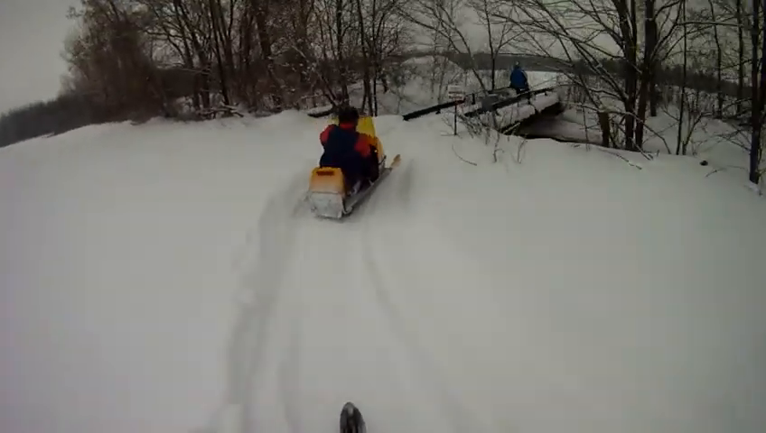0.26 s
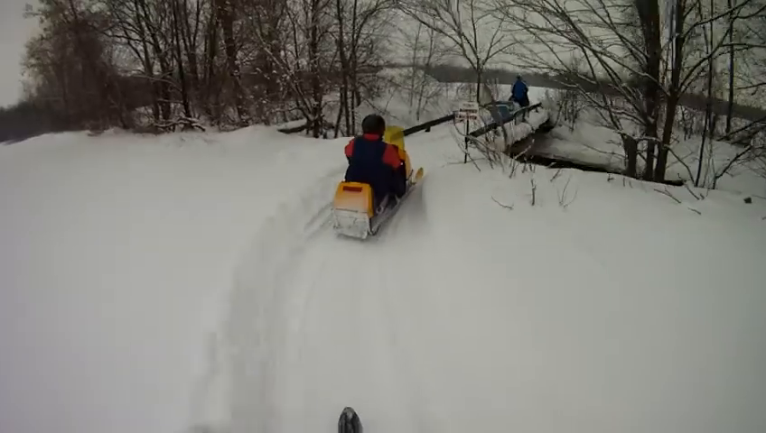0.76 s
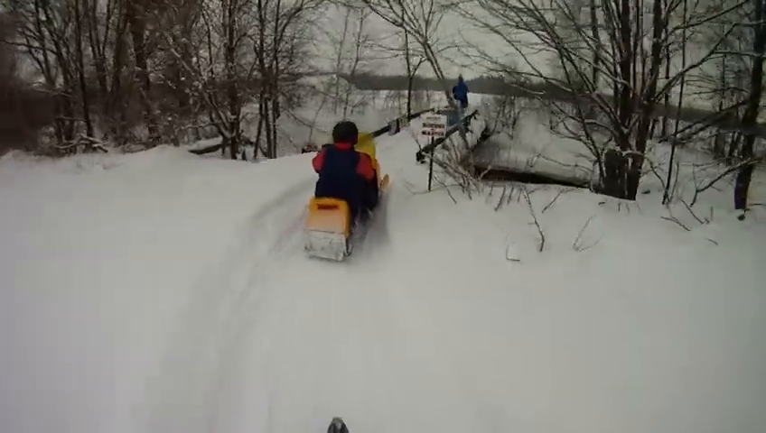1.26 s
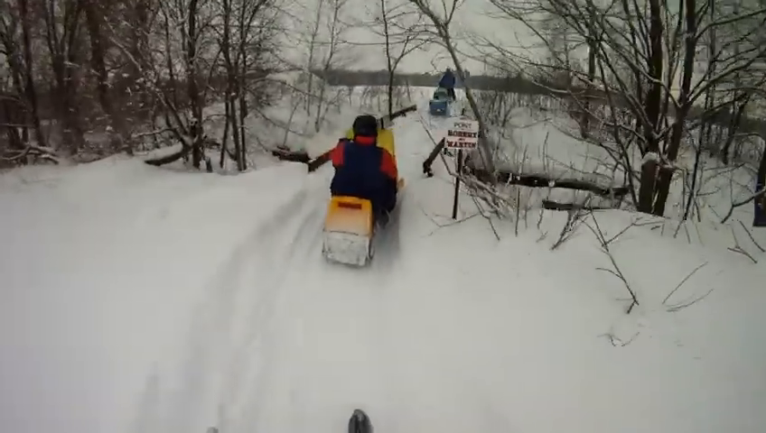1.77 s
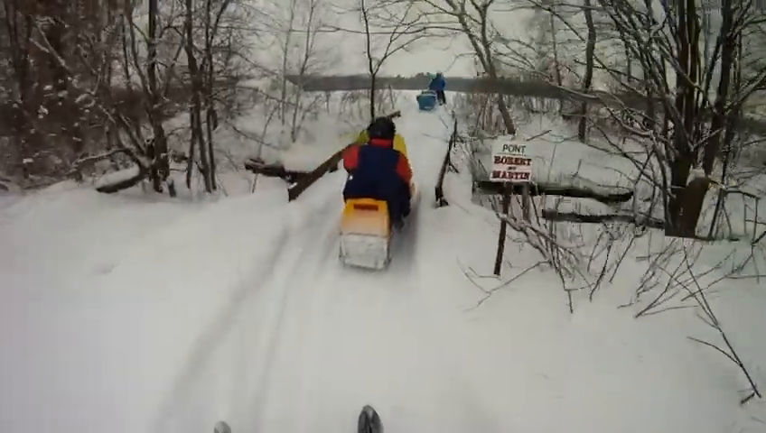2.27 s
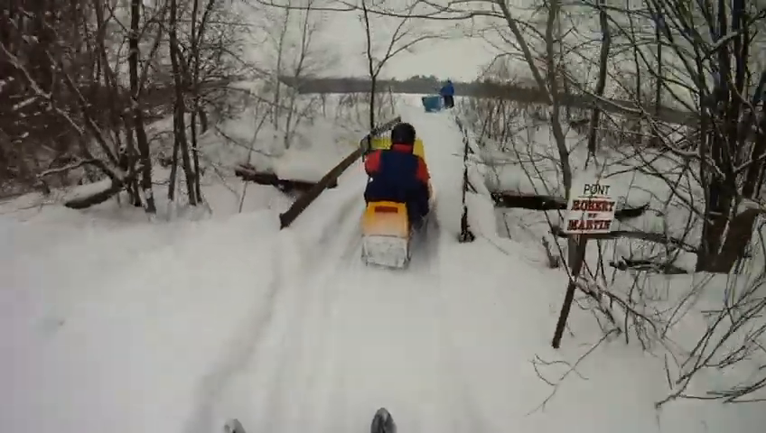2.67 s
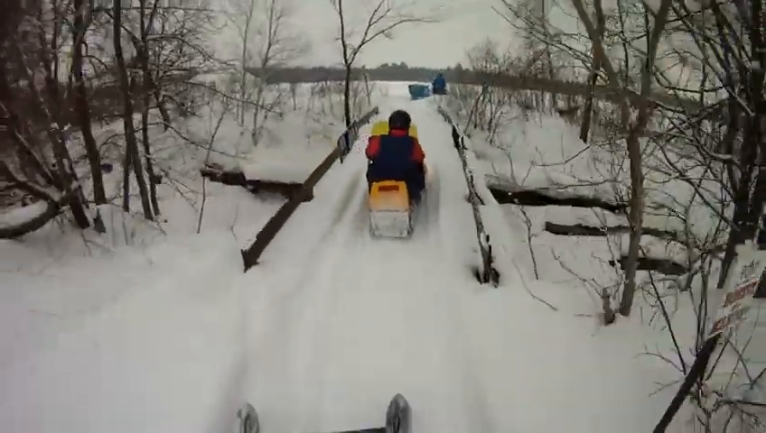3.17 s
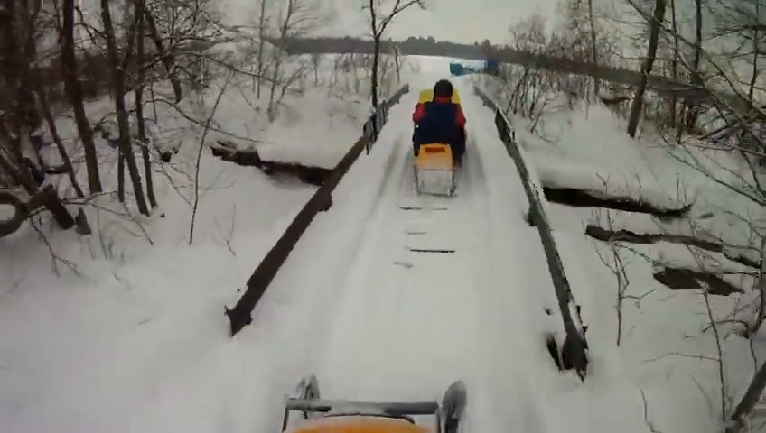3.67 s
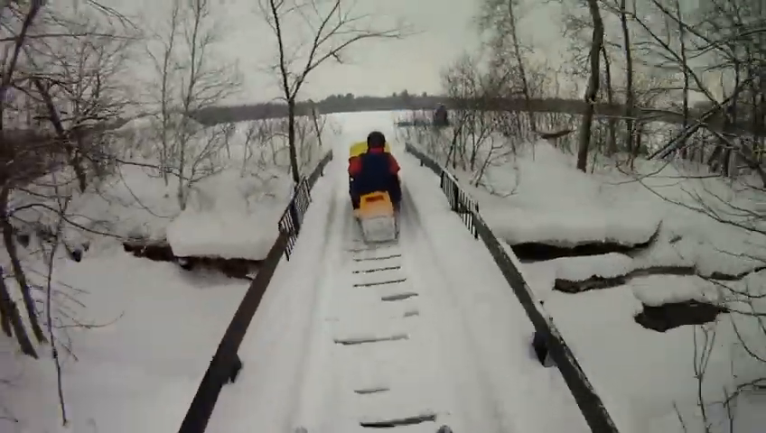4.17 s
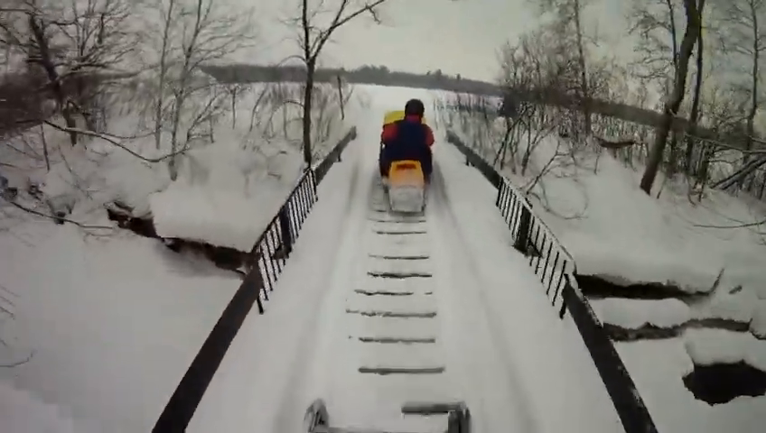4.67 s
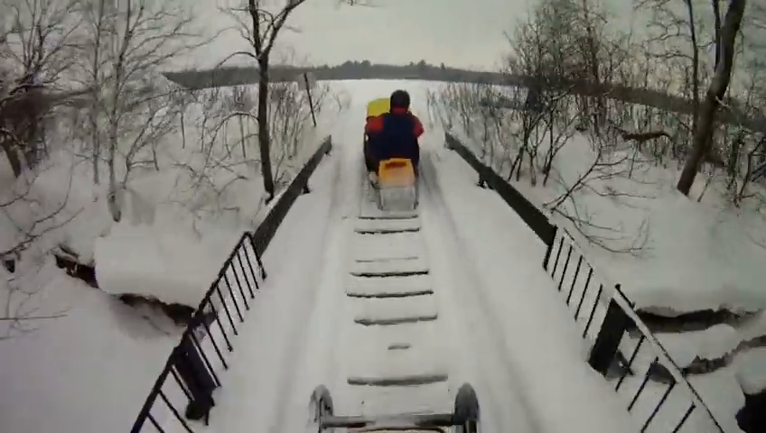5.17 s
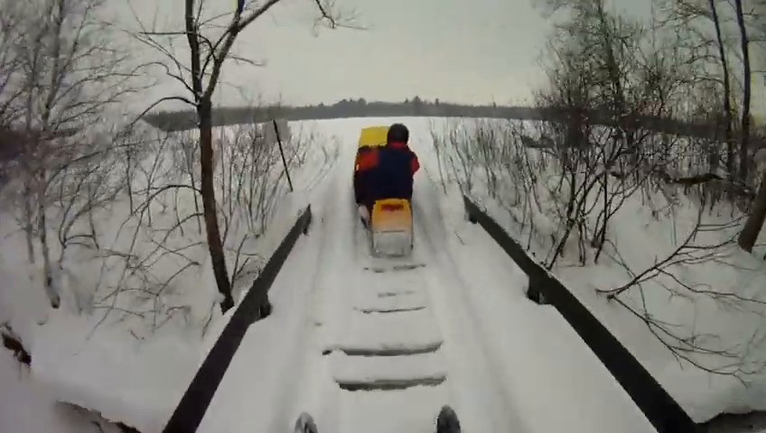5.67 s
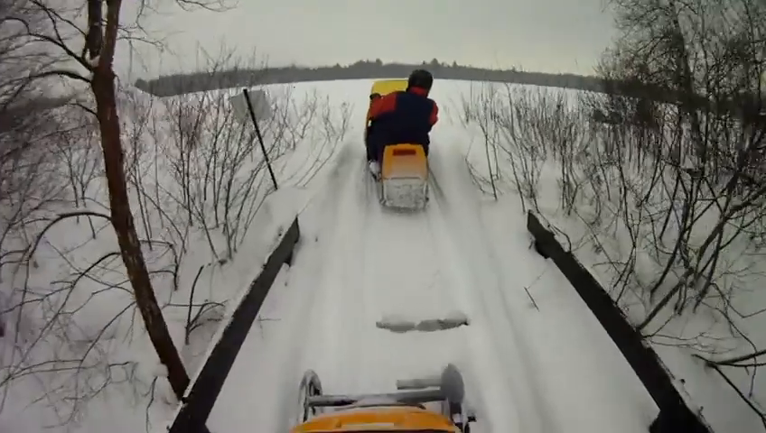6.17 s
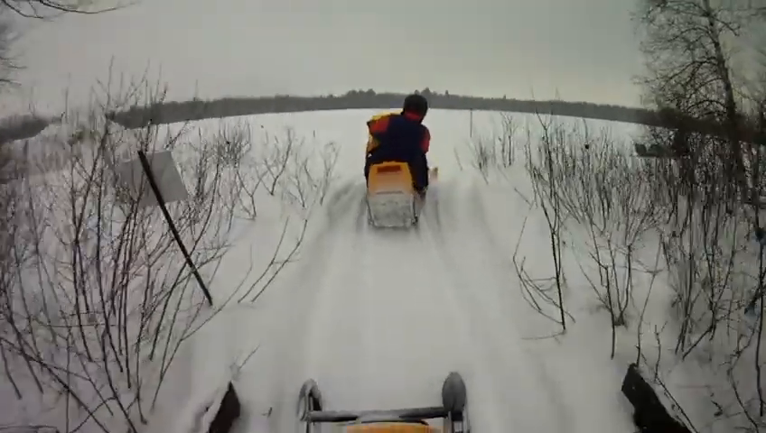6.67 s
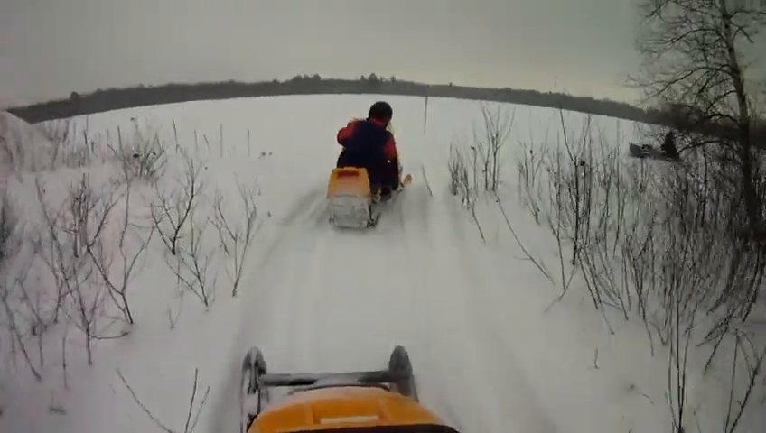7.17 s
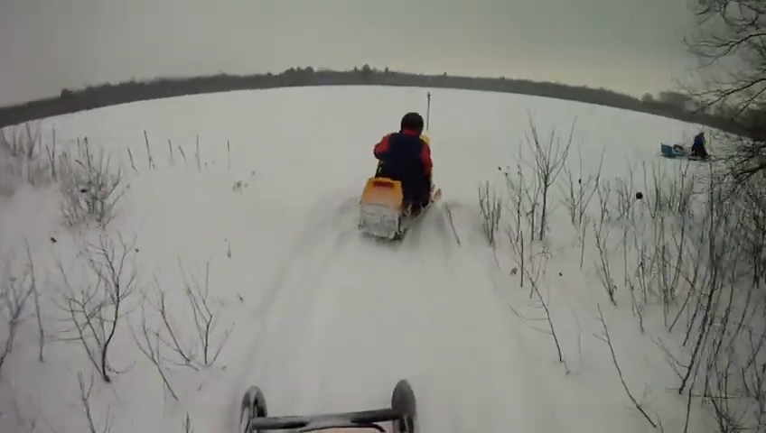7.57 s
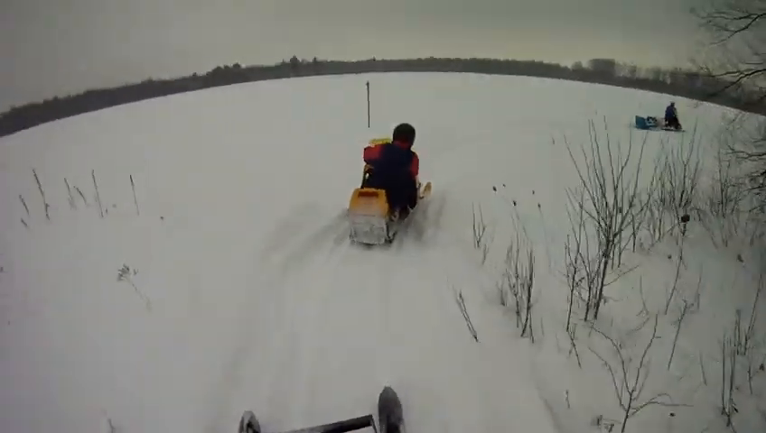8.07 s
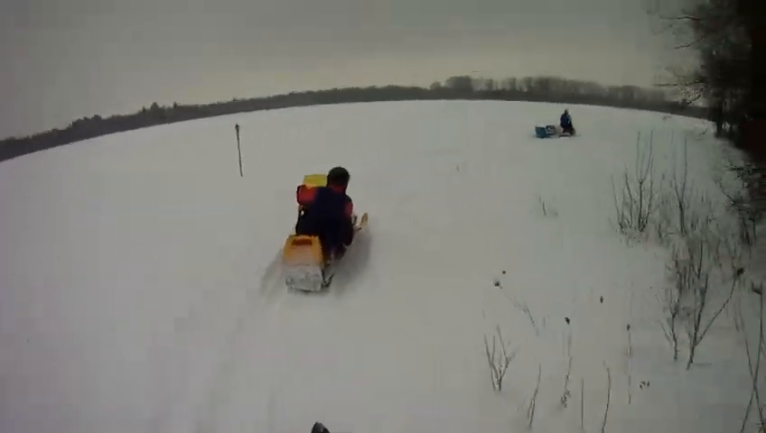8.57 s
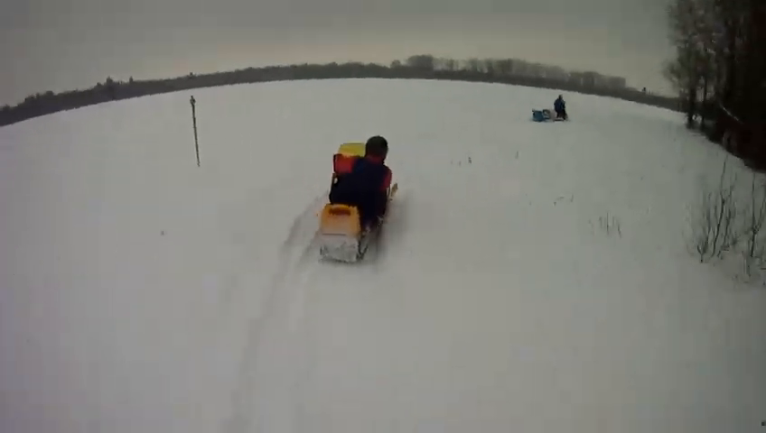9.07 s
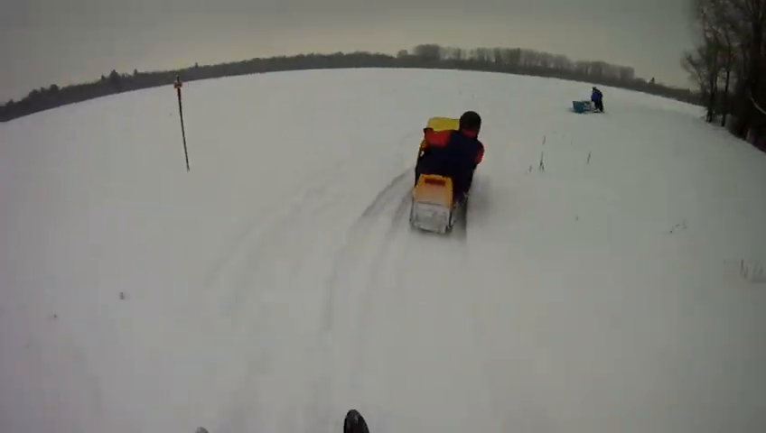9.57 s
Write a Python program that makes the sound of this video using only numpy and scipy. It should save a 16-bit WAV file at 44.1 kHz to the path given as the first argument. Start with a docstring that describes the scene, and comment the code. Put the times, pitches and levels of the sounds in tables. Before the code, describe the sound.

An old single-cylinder two-stroke snowmobile runs along a snowy trail, heard close from the rider's seat. After a brief burst of throttle it slows, misfiring with irregular pops and bangs. It picks up again and a hollow wooden bridge drums under the track. Beyond the bridge the engine pulls more steadily, then eases and surges. Track rumble, metallic rattle and a faint hiss of skis on snow continue throughout.

```python
"""An old single-cylinder two-stroke snowmobile crosses a snowy bridge, heard from the rider's seat.
Under throttle it fires on every turn; off throttle it misses and the stored charge bangs.
The piston clatters, the intake hums and rasps, the track rumbles and rattles, the wooden deck drums
and the skis scrape. The recorder's limiter ducks after each bang and its treble fizzes."""
import sys
import numpy as np
from scipy import signal
from scipy.fft import rfft, irfft, next_fast_len
from scipy.io import wavfile
from scipy.ndimage import uniform_filter1d, map_coordinates

SR = 44100
rng = np.random.default_rng(int(sys.argv[2]) if len(sys.argv) > 2 else 0)


def master(y):
    """Save y as 16-bit WAV."""
    cut = np.clip(np.atleast_2d(y).T, -1, 1)
    pcm = np.round(cut * 32767)  # scale
    wavfile.write(sys.argv[1], SR, pcm.astype(np.int16))


N = 433052
TIME = np.arange(N) / SR

# crank speed: (time [s], speed [turns/s])
CRANK_SPEED = [(0.0, 57.68), (0.24, 51.95), (0.44, 55.55), (0.7, 49.91), (1.16, 47.8), (1.74, 40.8),
               (1.91, 43.65), (2.25, 37.46), (2.85, 46.15), (3.03, 40.02), (3.38, 52.14), (3.69, 58.47),
               (4.22, 48.55), (4.65, 53.07), (4.86, 51.88), (5.27, 59.04), (5.78, 46.9), (6.04, 52.01),
               (6.26, 48.99), (6.52, 50.83), (6.77, 58.43), (7.0, 61.42), (7.28, 59.25), (8.09, 59.99),
               (8.32, 63.35), (8.78, 52.14), (9.18, 60.57), (9.82, 56.08)]


def from_db(db):
    """Decibels to gain."""
    return 10 ** (np.asarray(db) / 20)


def unit_rms(x):
    """Scale to unit rms."""
    return x / np.sqrt(np.mean(x ** 2) + 1e-20)


def colour(x, spectrum, skirt_db_per_octave=24):
    """Filter by a (Hz, dB) outline that falls away past its ends."""
    hz, db = np.transpose(spectrum)
    size = next_fast_len(N + SR // 2)
    bin_hz = np.maximum(np.arange(size // 2 + 1) * SR / size, 1)
    octaves_outside = np.abs(np.log2(bin_hz / np.clip(bin_hz, hz.min(), hz.max())))
    gain = from_db(np.interp(np.log(bin_hz), np.log(hz), db) - skirt_db_per_octave * octaves_outside)
    return irfft(rfft(x, size) * gain, size)[:N]


def resonate(x, modes, order=2):
    """Parallel resonances of alternating sign; higher order, steeper skirts."""
    out = np.zeros(N)
    for k, (hz, width_hz, db) in enumerate(modes):
        r = np.exp(-np.pi * width_hz * order / SR)
        b0 = (1 - r * r) / 2
        section = [b0, 0, -b0, 1, -2 * r * np.cos(2 * np.pi * hz / SR), r * r]
        out += (-1) ** k * from_db(db) * signal.sosfilt([section] * order, x + 1e-18)
    return out


def drift(rate_hz):
    """Random wander with unit spread."""
    knots = rng.standard_normal(4096)
    return map_coordinates(knots, [TIME * rate_hz], order=1, mode="wrap") * np.sqrt(3 / 2)


def clicks(times, sizes):
    """One impulse at each time."""
    at = np.round(np.asarray(times) * SR).astype(int)
    inside = (at >= 0) & (at < N)
    return np.bincount(at[inside], np.asarray(sizes)[inside], N)


def crank_hz(times):
    """Crank turns per second."""
    return np.interp(times, *np.transpose(CRANK_SPEED))


def doublings(times, cruise_hz=50):
    """Crank speed in doublings above cruise."""
    return np.log2(crank_hz(times) / cruise_hz)


def port_openings(phase_turns=0.68):
    """Times at which the exhaust port opens, once a turn."""
    turns = np.cumsum(crank_hz(TIME)) / SR
    return np.interp(np.arange(int(turns[-1])) + phase_turns, turns, TIME)


def throttle(times, travel_s=0.23):
    """Opening, 0-1: ramps up, holds and ramps down with each squeeze."""
    # lever squeezes: (start [s], length [s], opening [0-1])
    squeezes = [(.18, 0.236, 0.81), (2.42, 0.78, 0.16), (3.252, 0.74, 0.74), (4.246, 0.26, 0.51),
                (4.913, 0.4, 0.7), (5.882, 0.37, 0.34), (6.538, 0.44, 0.91), (7.012, 1.12, 0.64),
                (8.164, .25, 0.96), (8.933, .38, 0.56), (9.602, .35, 0.47)]
    start_s, length_s, opening = np.transpose(squeezes)[:, :, None]
    pressed = np.clip((times - start_s) / travel_s + 0.5, 0, 1)
    released = np.clip((times - start_s - length_s) / travel_s + 0.5, 0, 1)
    return np.clip((opening * (pressed - released)).sum(axis=0), 0, 1)


def misfires(times, clean_opening=0.96):
    """Misfiring, 0-1: rises as the throttle shuts."""
    return np.clip(1 - throttle(times) / clean_opening, 0, 1)


def engine_db(times, coast_db, throttle_db, doubling_db):
    """A part's level: coasting at cruise, plus terms for throttle and crank speed."""
    return coast_db + throttle_db * throttle(times) + doubling_db * doublings(times)


def scrape_db():
    """Level rise over each stretch of rough snow."""
    # rough snow: (middle [s], length [s], rise [dB])
    scrapes = [(.1, 1.44, 6.5), (1.103, 1.4, 3.5), (3.953, 1.3, 4.5), (4.636, 1, 2.5), (6.252, .35, 4),
               (6.7, .5, 6.5), (8.54, 0.95, 7), (9.438, 0.94, 7)]
    return sum(db * np.maximum(1 - 2 * np.abs(TIME - middle_s) / length_s, 0)
               for middle_s, length_s, db in scrapes)


def hiss(grain_db=2.0):
    """High grainy hiss: snow swish coloured by the recorder's treble fizz."""
    # hiss spectrum, with fizz peaks: (frequency [Hz], density [dB])
    spectrum = [(2500, -7), (3600, -37), (4300, -1.5), (5200, 7.5), (6000, -5), (6800, 4.5), (7700, -5.5),
                (8700, 4), (15000, -7.5)]
    level_db = engine_db(TIME, coast_db=-57.5, throttle_db=-1.5, doubling_db=3.5)
    gain = from_db(level_db + scrape_db() + grain_db * drift(300))
    return gain * unit_rms(colour(rng.standard_normal(N), spectrum))


def bridge(on_s=3.85, off_s=6.8, ramp_s=0.49, level_db=-24.5, lumpy_db=5.5):
    """The hollow wooden deck drums under the track while the sled is on it."""
    # deck modes: (frequency [Hz], width [Hz], level [dB])
    deck = [(179, 56, 0.5), (237, 67, 1), (329, 65, -8.5), (480, 90, -20)]
    weight = np.clip(np.minimum(TIME - on_s, off_s - TIME) / ramp_s, 0, 1)
    treading = from_db(lumpy_db * drift(60)) * rng.standard_normal(N)
    return from_db(level_db) * weight * unit_rms(resonate(treading, deck))


def track_rattle(scrape_share=0.55, uneven_db=1.0, ring_db=-8):
    """Cleats, bogie wheels and chain rattle unevenly and keep the cowl panels ringing."""
    # rattle spectrum: (frequency [Hz], density [dB])
    spectrum = [(400, -9), (680, -5), (830, -3.5), (980, -15), (1160, -2), (1400, -.5), (1540, -3),
                (1750, 0), (2000, -1), (2280, -2), (2550, -11.5), (3350, -7.5), (4200, -23), (6000, -34)]
    # cowl panel modes: (frequency [Hz], width [Hz], level [dB])
    cowl = [(1673, 48, 15), (1717, 31, -29), (2255, 65, 2)]
    level_db = engine_db(TIME, coast_db=-42, throttle_db=-2, doubling_db=3.5)
    gain = from_db(level_db + scrape_share * scrape_db() + uneven_db * (drift(160) + drift(20)))
    rattle = gain * unit_rms(colour(rng.standard_normal(N), spectrum))
    ringing = unit_rms(resonate(gain * rng.standard_normal(N), cowl))
    return rattle + from_db(ring_db) * np.std(rattle) * ringing


def track_rumble(lumpy_db=1.6, taut_db=-2.5, bass_db_per_doubling=5.0):
    """The rubber track drums on the tunnel: slack off throttle, taut under it, deeper with speed."""
    # track and tunnel spectrum: (frequency [Hz], density [dB])
    spectrum = [(20, -32), (35, -42), (52, -7), (75, -9), (105, -4), (145, -1), (215, -2.5), (280, -11.5),
                (370, -24), (480, -26.5), (650, -43), (1000, -73)]
    slack = unit_rms(colour(rng.standard_normal(N), spectrum))
    bass = colour(slack, [(20, 0), (65, 0)])
    slack += bass * (from_db(bass_db_per_doubling * doublings(TIME)) - 1)
    taut = from_db(taut_db) * colour(slack, [(20, -18), (100, -5.5), (170, -8), (400, -5.5), (1000, 3)])
    slack_share = misfires(TIME)
    level_db = engine_db(TIME, coast_db=-17.5, throttle_db=4.3, doubling_db=-1.5)
    return from_db(level_db + lumpy_db * drift(25)) * (slack_share * slack + (1 - slack_share) * taut)


def intake(times, lag_s=0.00048, hum_db=-28.5):
    """One gulp of air a turn, fired or not: the air box hums, the carburettor rasps as it opens."""
    # air box mode: (frequency [Hz], width [Hz], level [dB])
    airbox = [(137, 53.7, 0)]
    # open carburettor modes: (frequency [Hz], width [Hz], level [dB])
    carburettor = [(470, 53, 12), (770, 150, -8.5), (1204, 82, 1), (1700, 32, -11), (2256, 50, -3)]
    gulps = clicks(times + lag_s, np.ones(len(times)))
    hum = from_db(hum_db) * unit_rms(resonate(gulps, airbox))
    rasp_db = engine_db(TIME, coast_db=-56, throttle_db=19, doubling_db=9)
    return hum + from_db(rasp_db) * unit_rms(resonate(gulps, carburettor))


def piston(times, lag_s=0.00228, jitter_s=0.00008, scuff_decay_s=0.006, scuff_gain=0.33):
    """A knock and a scuff each turn ring the cylinder and cowl; misfires make them uneven."""
    # cylinder and cowl modes: (frequency [Hz], width [Hz], level [dB])
    cylinder = [(799, 100, -9), (1159.4, 51.5, 8), (1367, 85, 2.5), (1645, 57, -22), (2060, 61, -10),
                (2238, 21, 3), (2910, 37, -13), (3330, 190, -28)]
    misfiring = misfires(times)
    timing_draw, level_draw = rng.standard_normal((1024, 2))[:len(times)].T
    late_s = lag_s + jitter_s * misfiring * timing_draw
    scatter_db = 0.6 + 0.9 * misfiring
    knocks = clicks(times + late_s, from_db(scatter_db * level_draw))
    scuff_envelope = signal.lfilter([1], [1, -np.exp(-1 / (scuff_decay_s * SR))], knocks + 1e-18)
    scuff = scuff_envelope * rng.standard_normal(N)
    force = unit_rms(knocks) + scuff_gain * unit_rms(scuff)
    level_db = engine_db(TIME, coast_db=-43, throttle_db=5, doubling_db=-1.5)
    return from_db(level_db) * unit_rms(resonate(force, cylinder))


def firings(times, recovery=1.08, burn_spread=0.32, min_burn=0.15, stored_boost=0.24, scatter_db=0.83):
    """A poor burn leaves its charge for the next turn, which fires harder."""
    # hardest firings of a stored charge: (time [s], level [dB])
    bangs = [(.184, 1), (0.398, .5), (0.642, -1), (1.025, 1), (1.238, 0.5), (1.347, 9), (1.549, 3.5),
             (1.692, 3), (1.858, -2), (2.092, 3), (2.596, 1), (2.801, 0), (3.036, -0.5), (3.319, 0.5),
             (4.645, -3.5), (4.793, 0.5), (5.333, 3), (5.554, 8), (5.837, 3), (6.278, 2), (8.449, 2),
             (8.885, 1), (9.321, 2)]
    bang_s, bang_db = np.transpose(bangs)
    # a bang replaces the nearest firing and clears the cylinder
    bang_turns = np.abs(times - bang_s[:, None]).argmin(axis=1)
    misfiring = misfires(times)
    burn_draw, level_draw = rng.standard_normal((1024, 2))[:len(times)].T
    level_db = engine_db(times, coast_db=-6, throttle_db=1.5, doubling_db=-4)
    sizes = from_db(level_db + scatter_db * level_draw)
    unburnt = 0
    for k in range(len(times)):
        shortfall = misfiring[k] * (1 - recovery * unburnt + burn_spread * burn_draw[k])
        burn = np.clip(1 - shortfall, min_burn, 1)
        sizes[k] *= burn * (1 + stored_boost * unburnt)
        unburnt = 0 if k in bang_turns else 1 - burn
    sizes[bang_turns] = 0
    return clicks(times, sizes) + clicks(bang_s, from_db(bang_db))


def exhaust(fired, unit_load_hz_per_s=18):
    """Each firing is a rounded puff that sets hood and pipe booming; the muffler growls under load."""
    # one puff behind the muffler: (frequency [Hz], level [dB])
    puff = [(22, -19), (45, -5), (60, -5.5), (85, -4), (120, 0.5), (180, -1.5), (240, -4), (300, -9),
            (420, -20), (600, -29.5), (800, -53.5), (1000, -80)]
    # hood and pipe modes: (frequency [Hz], width [Hz], level [dB])
    hood_and_pipe = [(123, 17, -11), (196, 32, -8), (241.5, 11, -10)]
    # loaded muffler mode: (frequency [Hz], width [Hz], level [dB])
    muffler = [(399, 88, -3)]
    puff_peak = colour(clicks([0.1], [1.0]), puff).max()
    puffs = colour(fired, puff) / puff_peak
    accel_hz_per_s = uniform_filter1d(np.gradient(crank_hz(TIME), TIME), size=SR // 6)
    load = np.clip(accel_hz_per_s / unit_load_hz_per_s, 0, 2) * (1 - misfires(TIME))
    boom = sum(resonate(puffs, [mode], order=1) for mode in hood_and_pipe)
    growl = resonate(puffs * load, muffler)
    return puffs + boom + growl


def scene():
    """The microphone rides with the sled; both channels alike."""
    times = port_openings()
    engine = exhaust(firings(times)) + intake(times) + piston(times)
    sled = engine + track_rumble() + track_rattle() + hiss() + bridge()
    return np.array([sled, sled])


def limiter(x, threshold_db=-7.0, slope=0.61, attack_s=0.00097, release_db_per_s=95):
    """Gain ducks at each peak, looking one attack time ahead, then recovers."""
    over_db = np.maximum(20 * np.log10(np.abs(x[0]) + 1e-9) - threshold_db, 0)
    release_db = release_db_per_s * TIME
    held_db = np.maximum.accumulate(over_db + release_db) - release_db
    pole = np.exp(-1 / (attack_s * SR))
    duck_db = slope * signal.lfilter([1 - pole], [1, -pole], held_db)
    return x * from_db(-np.interp(TIME + attack_s, TIME, duck_db))


def fizz(x, mirror_hz=12000, gain_db=2.0):
    """Uneven sampling mirrors the signal's slope to both sides of one high frequency."""
    return from_db(gain_db) * np.gradient(x, axis=-1) * np.cos(2 * np.pi * mirror_hz * TIME)


def record(dry, cutoff_hz=15600):
    """Recorder: limiter, fizz, clipping, steep low-pass."""
    limited = limiter(dry)
    clipped = np.clip(limited + fizz(limited), -1, 1)
    lowpass = signal.ellip(10, 0.2, 80, cutoff_hz, fs=SR, output="sos")
    return signal.sosfilt(lowpass, clipped)


dry = scene()
out = record(dry)
master(out)
```